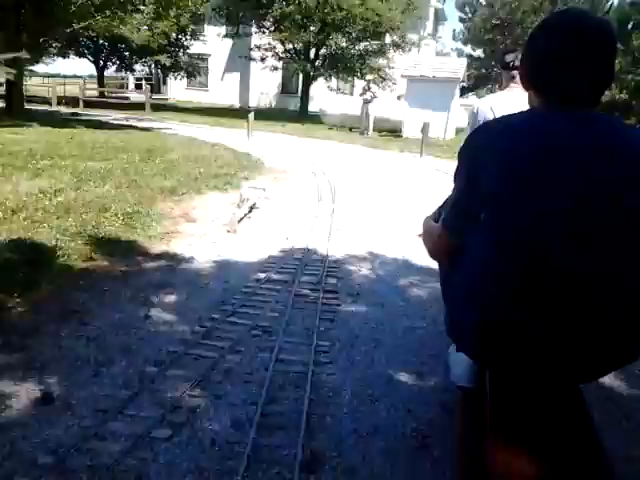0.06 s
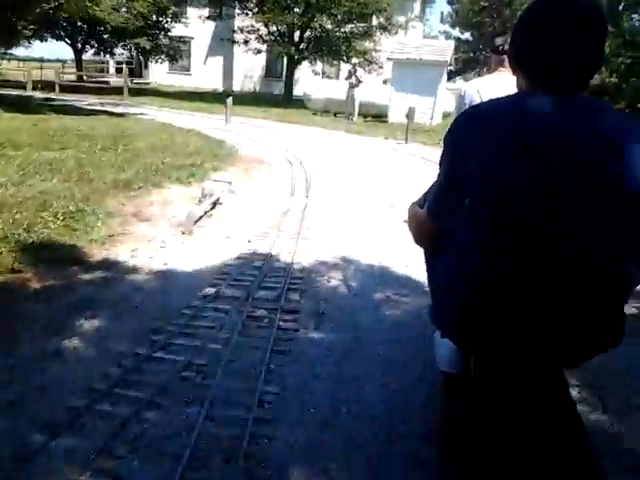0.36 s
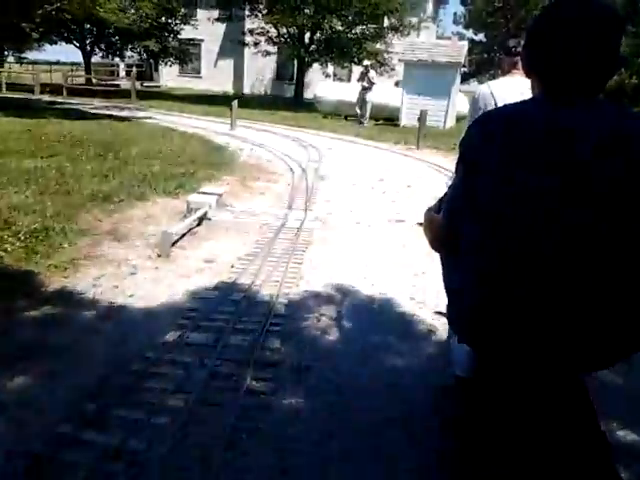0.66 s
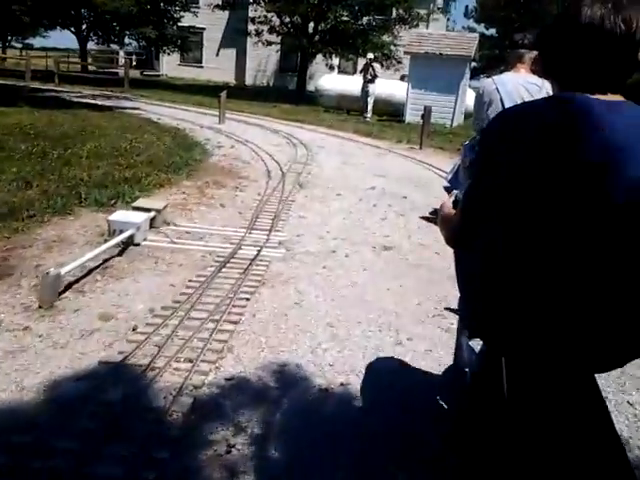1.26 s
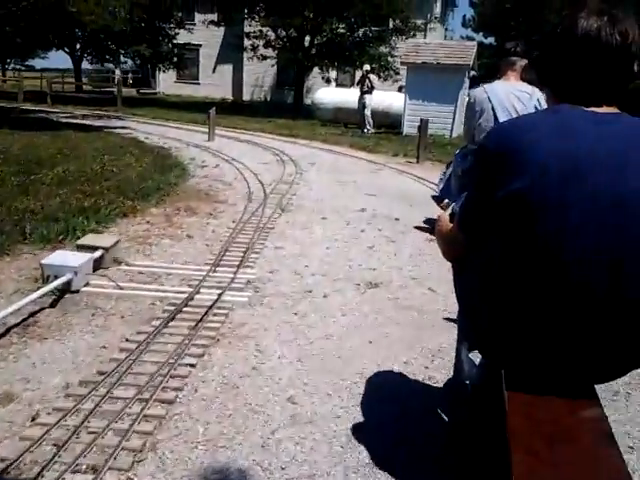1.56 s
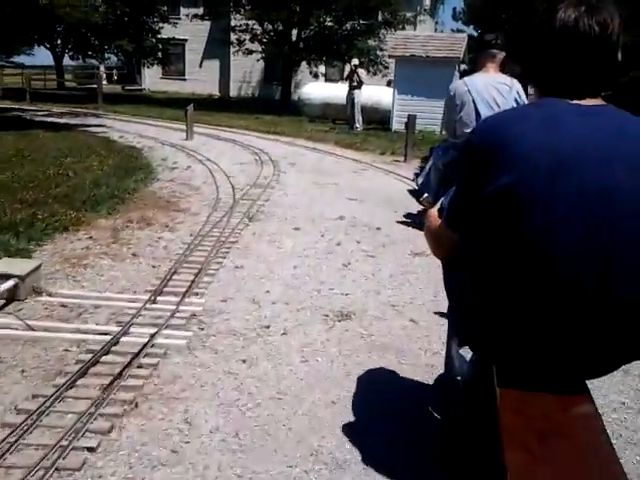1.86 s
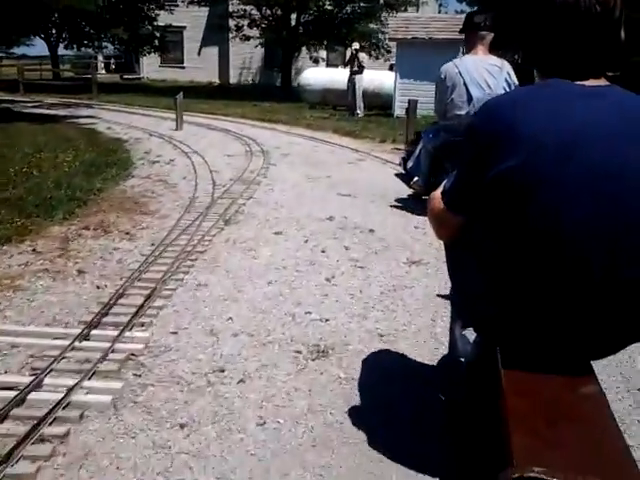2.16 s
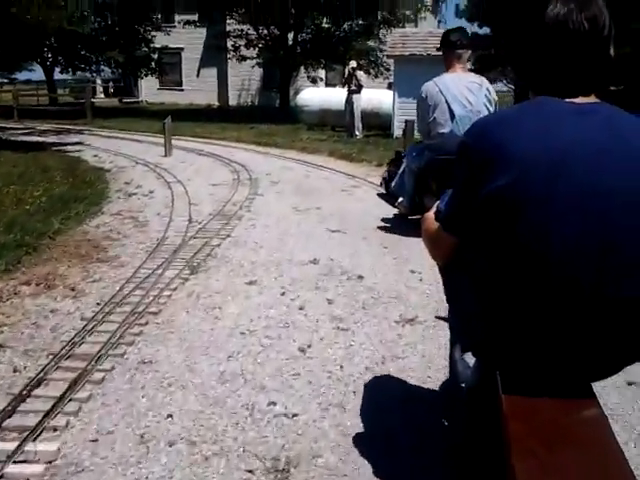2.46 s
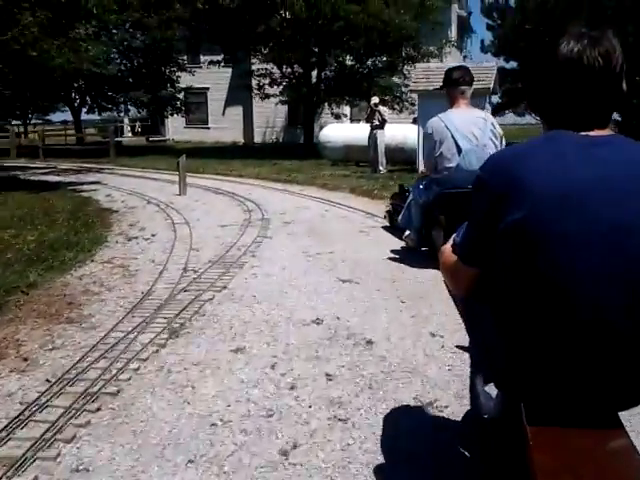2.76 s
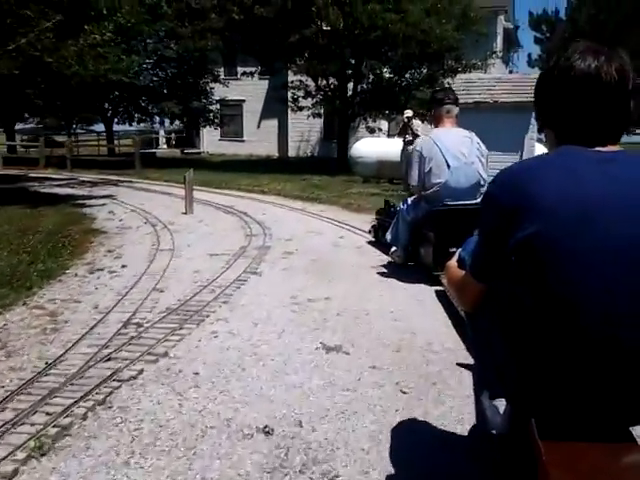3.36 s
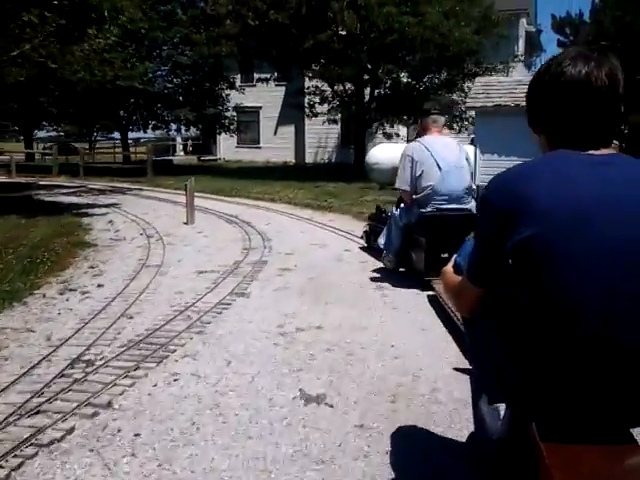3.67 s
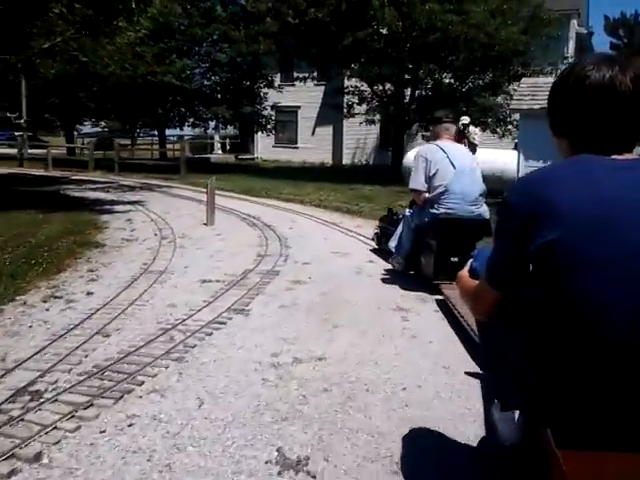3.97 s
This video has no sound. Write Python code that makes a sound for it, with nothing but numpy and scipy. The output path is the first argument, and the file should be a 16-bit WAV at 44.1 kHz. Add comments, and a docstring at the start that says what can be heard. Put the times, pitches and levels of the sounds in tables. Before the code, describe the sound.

Heard from aboard in open air, a small ride-on train rumbles and clacks over rail joints. The clacks come in irregular clusters, turn sharper and ring briefly across a switch, then thin out, with light ticks and dull thumps.

```python
"""Steel wheels of a miniature ride-on train clack over rail joints and a switch, heard from a car.
Each joint excites body, frame and steel; some leave a wheel ringing. Rough rails keep the body
rumbling, the frame rattling and the wheels hissing. Loose metal ticks, the car thumps as it rocks,
flanges brush the rail and grit cracks under the wheels. Open air, no echo."""
import sys
import numpy as np
from scipy import signal
from scipy.fft import rfft, irfft
from scipy.io import wavfile
from scipy.ndimage import uniform_filter1d

SR = 44100
rng = np.random.default_rng(int(sys.argv[2]) if len(sys.argv) > 2 else 0)


def materialize(psi):
    """Save the field psi as 16-bit PCM at rate SR to the path in sys.argv[1].

    A 1-D psi becomes a single channel; in a 2-D psi each row is a channel.
    """
    bounded = np.clip(np.atleast_2d(psi).T, -1, 1)
    quanta = np.round(bounded * 32767).astype(np.int16)
    wavfile.write(sys.argv[1], SR, quanta)


N = 176400
TIME_S = np.arange(N) / SR
HIT_TIME_S = np.arange(SR // 4) / SR
ATTACK_S = 0.0014


def undb(db):
    """Decibels to gain."""
    return 10 ** (np.asarray(db) / 20)


def unit(x):
    """Scale to rms 1."""
    return x / np.sqrt(np.mean(x ** 2))


def curve(points, column=1):
    """Gain over time from one dB column of a timeline."""
    points = np.array(points)
    return undb(np.interp(TIME_S, points[:, 0], points[:, column]))


def wander(rate_hz):
    """Random drift, spread near 1."""
    knots = rng.standard_normal(1024)
    return np.interp(TIME_S * rate_hz, np.arange(len(knots)), knots)


def add(out, start_s, sound):
    """Mix a sound in at a time."""
    i = int(start_s * SR)
    out[i:i + len(sound)] += sound[:N - i]


# Edges of the body, frame and steel bands (frequency [Hz])
BAND_EDGES_HZ = [30, 1550, 3400, 20000]
def colour(x, spectrum, band=None, size=4096):
    """Minimum-phase filter with the given spectrum, optionally cut to one band."""
    hz, db = np.array(spectrum, float).T
    f = np.maximum(np.arange(size // 2 + 1) * SR / size, 1)
    gain = undb(np.interp(np.log(f), np.log(hz), db))
    if band is not None:
        low_hz, high_hz = BAND_EDGES_HZ[band:band + 2]
        gain = gain / np.sqrt((1 + (low_hz / f) ** 16) * (1 + (f / high_hz) ** 16)) + 1e-5
    cepstrum = irfft(np.log(gain))
    cepstrum[1:size // 2] *= 2
    cepstrum[size // 2 + 1:] = 0
    impulse_response = irfft(np.exp(rfft(cepstrum)))
    return signal.fftconvolve(x, impulse_response)[:len(x)]


def resonance(hz, half_width_hz):
    """A mode driven by random contact, rms 1; it radiates no deep bass."""
    f = np.maximum(np.fft.rfftfreq(N, 1 / SR), 1)
    detuning = (f - hz ** 2 / f) / (2 * half_width_hz)
    return unit(irfft(rfft(rng.standard_normal(N)) / (1 + 1j * detuning) ** 2, N))


def ringing(modes, wander_db=4):
    """Modes swell and fade independently as the contact shifts."""
    return sum(resonance(hz, half_width_hz) * undb(db + wander_db * wander(rate_hz=14))
               for hz, half_width_hz, db in modes)


def blow(envelope, spectrum, db, band=None, knock=0):
    """Contact chatter plus an optional knock, filtered; db is the rms of the loudest 10 ms."""
    force = envelope * rng.standard_normal(len(envelope))
    force[int(ATTACK_S * SR)] += knock * np.sqrt(np.sum(envelope ** 2))
    sound = colour(force, spectrum, band)
    peak_rms = np.sqrt(uniform_filter1d(sound ** 2, int(0.01 * SR)).max())
    return sound * undb(db) / peak_rms


# Cracking grit (frequency [Hz], gain [dB])
GRIT_SPECTRUM = [(500, -1), (3000, 4), (5500, -3.5), (8300, 6.5), (11500, -3), (16000, -12)]
def grit(grains_per_s=170, level_db=-48, spread_db=5, decay_s=0.0017):
    """Grains on the rail head crack under the wheels, each a tiny tick of three pitches."""
    out, t = np.zeros(N), np.arange(SR // 50) / SR
    for _ in range(int(grains_per_s * N / SR)):
        pitches_hz = rng.uniform(3300, 13900, size=(3, 1))
        strength = undb(spread_db * min(rng.exponential(), 2))
        tones = np.sin(2 * np.pi * pitches_hz * t).sum(axis=0)
        add(out, rng.random() * N / SR, strength * np.exp(-t / decay_s) * tones)
    return unit(colour(out, GRIT_SPECTRUM)) * undb(level_db)


# Flange contacts (start [s], length [s], frequency [Hz], level [dB])
FLANGE_SCRAPES = [(1.676, 0.019, 8600, -35), (2.105, 0.076, 4530, -41), (3.5, 0.037, 4800, -47)]
def flange_scrapes():
    """A flange brushes the rail: a short swell of narrow-band noise."""
    out = np.zeros(N)
    for start_s, length_s, hz, db in FLANGE_SCRAPES:
        swell = np.sin(np.pi * np.clip((TIME_S - start_s) / length_s, 0, 1))
        out += resonance(hz, half_width_hz=0.08 * hz) * undb(db) * swell
    return out


# Bass noise (frequency [Hz], gain [dB])
BASS_SPECTRUM = [(25, -38), (60, -38), (90, -21), (125, -14), (200, -3), (280, 0.5), (360, 5.5),
                 (450, -12.5), (1000, -80.5), (8000, -100)]
# Bass timeline (time [s], level [dB])
BASS_LEVELS = [(0, -52), (.12, -40), (.28, -49), (.48, -58), (.62, -39), (.8, -39), (.97, -46.5),
               (1.12, -43.5), (1.38, -49), (1.62, -38.5), (1.8, -45), (2.1, -45), (2.4, -52), (2.92, -55),
               (3.08, -40.5), (3.25, -42.5), (3.5, -51.5), (4, -34.5)]
def bass():
    """Weak low noise rises and falls under the rumble."""
    return unit(colour(rng.standard_normal(N), BASS_SPECTRUM)) * curve(BASS_LEVELS)


# Hollow body modes (frequency [Hz], half-width [Hz], relative level [dB])
BODY_MODES = [(499, 28, 0.5), (562.3, 31, 4), (691.4, 73, 9.5)]
# Body resonance timeline (time [s], level [dB])
BODY_LEVELS = [(0, -30.5), (.6, -31), (.95, -31), (1.2, -28), (1.55, -35.5), (1.95, -31), (2.4, -33),
               (2.9, -33), (4, -51)]
def hollow_body():
    """Rolling keeps the hollow car body resonating."""
    return unit(ringing(BODY_MODES)) * curve(BODY_LEVELS)


# Tick of loose metal (frequency [Hz], gain [dB])
TICK_SPECTRUM = [(200, -59), (2000, -7), (6000, -23), (8500, 6.5), (10200, 2), (12000, -23), (16000, -25)]
# Ticks (start [s], level [dB], pitch [ratio])
METAL_TICKS = [(0.141, -34, 1.16), (1.803, -29, 0.99), (1.8204, -31, 0.93), (1.8249, -15, 1.06),
               (1.8258, -23, .97), (1.835, -27, 0.99), (1.884, -42, 1), (2.414, -39, 0.88),
               (2.472, -46, 1.4), (2.718, -47, .9), (3.2412, -33.5, 0.62), (3.2637, -40, 1.2),
               (3.341, -41, 1), (3.897, -33, 1), (3.924, -36, 0.89)]
def loose_metal(decay_s=0.0007):
    """Loose parts strike in short, bright ticks."""
    out = np.zeros(N)
    envelope = np.exp(-HIT_TIME_S / decay_s)
    for start_s, db, pitch in METAL_TICKS:
        add(out, start_s, blow(envelope, np.array(TICK_SPECTRUM) * [pitch, 1], db))
    return out


# Thump of the car (frequency [Hz], gain [dB])
THUMP_SPECTRUM = [(25, -65), (55, -59), (100, -27), (200, -1.5), (320, 9), (600, 8), (1200, 1.5),
                  (3000, -77), (16000, -100)]
# Thumps (start [s], level [dB], pitch [ratio], swell [s])
CAR_THUMPS = [(0.129, -36, 0.64, .018), (.732, -21, 1.05, 0.013), (0.755, -19.5, 0.89, 0.0072),
              (0.774, -34, 0.5, 0.0081), (1.53, -28, 0.8, 0.016), (1.636, -35, 0.52, 0.0086),
              (1.666, -31, 0.57, 0.0095), (1.905, -18.5, .9, 0.0017), (2.13, -33, 0.53, .01),
              (3.185, -26, 1.4, 0.0031), (3.551, -29, 0.87, .005)]
def rocking_car():
    """The car rocks on its wheels with dull, swelling thumps."""
    out, t = np.zeros(N), HIT_TIME_S
    for start_s, db, pitch, swell_s in CAR_THUMPS:
        envelope = t / swell_s * np.exp(-t / swell_s)
        add(out, start_s, blow(envelope, np.array(THUMP_SPECTRUM) * [pitch, 1], db))
    return out


# Rolling noise (frequency [Hz], gain [dB])
ROLL_SPECTRUM = [(30, -54), (70, -45), (120, -46), (180, -28.5), (240, -13.5), (300, -9), (390, 0.5),
                 (500, 3.5), (610, -3.5), (730, 1.5), (940, 3), (1200, -2.5), (1420, -3), (1620, -7),
                 (2000, -2), (2300, -4), (2780, -6.5), (3200, -18.5), (4000, -27), (5200, -27.5),
                 (6100, -28.5), (7100, -22.5), (8200, -19), (9200, -23), (10400, -31.5), (13000, -39.5),
                 (16000, -40)]
# Rolling base levels (time [s], body rumble [dB], frame rattle [dB], wheel hiss [dB])
ROLL_LEVELS = [(0, -20.5, -28, -34.5), (.15, -21, -33.5, -36), (.45, -23, -30, -37), (.68, -25, -33, -37),
               (.82, -21, -28.5, -33), (.97, -28, -33.5, -37.5), (1.15, -22.5, -28.5, -34),
               (1.38, -21.5, -30.5, -36), (1.6, -26, -31.5, -41.5), (1.78, -23, -29, -36),
               (1.95, -22, -31.5, -35), (2.18, -23, -31, -35), (2.35, -23.5, -30, -35),
               (2.6, -24.5, -32, -36.5), (3.05, -25, -34, -36), (3.22, -20.5, -29, -32.5),
               (3.58, -24, -31, -37), (4, -21.5, -31, -34)]
# Roughness; rows body, frame, steel (bump spread [dB], flutter [dB], level offset [dB])
BAND_ROUGHNESS = [(2.5, 0.6, -5), (2, 2, -4), (-1, 1.66, -4)]
# Wheel and frame modes (frequency [Hz], half-width [Hz], level re base rumble [dB])
WHEEL_FRAME_MODES = [(241, 16.6, -29.5), (369.5, 37, -19), (872, 49, -14.5), (1004, 39, -14),
                     (1144, 72, -19.5), (1333, 54, -22), (1450, 31, -24), (1980, 190, -22),
                     (2280, 120, -20.5), (3643, 99, -35), (4286, 310, -34), (8150, 330, -28.5),
                     (9460, 160, -34), (11000, 280, -40), (13400, 150, -55)]
def rolling(bumps_per_s=12000):
    """Tiny rail bumps shake body, frame and wheels together and keep their modes ringing."""
    out = np.zeros(N)
    shake_db = 1.35 * wander(rate_hz=23.77)
    for band, (spread_db, flutter_db, offset_db) in enumerate(BAND_ROUGHNESS):
        sizes = undb(spread_db * np.minimum(rng.exponential(size=N), 5))
        bumps = (rng.random(N) < bumps_per_s / SR) * rng.standard_normal(N) * sizes
        noise = unit(colour(bumps, ROLL_SPECTRUM, band))
        gain = undb(offset_db + shake_db + flutter_db * wander(rate_hz=45))
        out += noise * gain * curve(ROLL_LEVELS, column=band + 1)
    return out + ringing(WHEEL_FRAME_MODES) * curve(ROLL_LEVELS)


# Wheel or rail notes after a joint (start [s], frequency [Hz], level [dB], t60 [s])
WHEEL_NOTES = [(.204, 13540, -45, .3), (.31, 13540, -45, .42), (0.311, 5600, -32.5, 0.095),
               (1.66, 9600, -26, 0.21), (1.746, 9490, -29, 0.11), (1.746, 4200, -31, .075),
               (1.869, 13600, -44, .2), (1.867, 3830, -16, 0.037), (1.869, 2780, -14, 0.027),
               (1.876, 860, -15, 0.071), (1.955, 15000, -44, .3), (1.957, 2500, -15, 0.028),
               (1.955, 3670, -33, 0.18), (1.953, 4000, -15, 0.024), (1.97, 4030, -36, 0.16),
               (1.955, 4900, -42, .25), (2.222, 2755, -15, 0.023), (2.31, 3100, -19, 0.022),
               (2.31, 3030, -18, 0.04), (2.31, 1300, -24, .06)]
def wheel_rings(rise_s=0.0021, split_hz=18, twin_db=-17.5):
    """A struck wheel rings; being slightly out of round, each note beats with a weaker twin."""
    out, t = np.zeros(N), HIT_TIME_S
    for start_s, hz, db, t60_s in WHEEL_NOTES:
        note = np.sin(2 * np.pi * hz * t)
        twin = undb(twin_db) * np.sin(2 * np.pi * ((hz + split_hz) * t + rng.random()))
        envelope = (1 - np.exp(-t / rise_s)) * undb(-60 * t / t60_s)
        add(out, start_s, undb(db) * envelope * (note + twin))
    return out


# Joint clack (frequency [Hz], gain [dB])
CLACK_SPECTRUM = [(80, -75), (200, -28.5), (420, -3), (750, -6.5), (1020, -3), (1600, -10.5), (2100, -3.5),
                  (2750, -7.5), (3250, -15), (3900, -11), (5200, -13.5), (6300, -9.5), (7800, -2),
                  (9800, -7.5), (12000, -14.5), (15500, -22)]
# Response to a joint; rows body, frame, steel
# (decay [s], tail level [dB], tail decay [s], resonance height [dB], half-width [octaves])
CLACK_RESPONSE = [(0.0079, -25, 0.0062, 7, 0.073), (0.0053, -18, .012, 10.5, 0.053),
                  (0.0016, -12.5, 0.013, 8, 0.1)]
# Contact time below which knock outweighs chatter (body [s], frame [s], steel [s])
KNOCK_LIMIT_S = [0.0012, 0.00049, 0.0012]
# Wheels on joints (start [s], contact [s], body, frame, steel level [dB], same three resonances [Hz])
JOINT_HITS = [(.024, 0.0015, -18, -26.5, -23.5, 1030, 2260, 8700),
              (.0898, 0.0027, -20, -21, -19, 1065, 2620, 6650),
              (.113, 0.0017, -20, -21, -18, 790, 2300, 7400),
              (.1803, 0.0014, -26, -19, -17.5, 490, 2010, 10600),
              (.196, 0.0016, -23, -28, -33, 462, 2207, 8500),
              (.2026, 0.0012, -29, -32, -19, 441, 1787, 10500),
              (.3083, 0.0026, -17.5, -19.5, -20, 746, 2240, 9700),
              (.3175, 0.0022, -16.5, -23.5, -39, 725, 2540, 8500),
              (.398, 0.0025, -24, -21.5, -19.5, 1020, 2460, 8400),
              (.8514, 0.0027, -27, -49, -30, 505, 1636, 8500),
              (.951, .002, -23, -30, -31.5, 790, 2100, 8300),
              (1.023, 0.0025, -18.5, -24.5, -28, 960, 1890, 8900),
              (1.040, 0.0017, -29, -26.5, -31, 800, 2100, 8300),
              (1.1103, 0.0059, -18, -28, -29.5, 524, 2034, 8400),
              (1.2145, 0.0039, -14, -26.5, -27.5, 780, 2100, 6250),
              (1.3027, 0.0015, -18, -25.5, -27, 890, 2240, 8500),
              (1.6568, 0.0039, -21.5, -26.5, -20, 710, 2153, 8200),
              (1.7432, 0.0023, -20, -23.5, -17, 530, 2440, 9000),
              (1.8668, 0.0019, -17.5, -25.5, -17.5, 440, 2760, 10400),
              (1.9522, 0.0035, -22, -25.5, -21, 605, 2200, 6840),
              (2.0166, 0.00095, -16, -23.5, -27.5, 970, 2024, 7500),
              (2.1017, 0.0016, -17.5, -24, -22, 970, 1750, 9200),
              (2.2224, 0.0027, -19.5, -22.5, -19, 1300, 2740, 8300),
              (2.2563, 0.0045, -28, -21, -18, 398, 2040, 9000),
              (2.2975, 0.0024, -20.5, -48, -36, 840, 1808, 8500),
              (2.3082, .004, -18.5, -18.5, -19, 725, 2750, 8150),
              (2.512, 0.0067, -23.5, -46, -52, 979, 2250, 8500),
              (2.7412, .003, -32, -34, -30.5, 785, 2077, 8300),
              (2.828, 0.0031, -45, -29, -33, 656, 2282, 8400),
              (3.0952, 0.0047, -17.5, -27, -25, 1040, 1750, 9600),
              (3.1828, 0.00085, -16, -34, -33.5, 516, 1948, 8500),
              (3.2218, 0.00074, -20.5, -32, -34, 920, 2330, 8500),
              (3.5455, .002, -30, -34, -32.5, 872, 1819, 8600),
              (3.6225, .003, -34, -32, -32, 726, 2099, 8600),
              (3.8758, 0.0022, -22.5, -28.5, -24.5, 915, 2060, 11000),
              (3.9597, 0.0039, -17, -34, -22, 1130, 2130, 9600)]
def rail_joints():
    """Each wheel crashes over the gap for a few ms, exciting a resonance in body, frame and steel."""
    out, t = np.zeros(N), HIT_TIME_S
    hz = np.geomspace(40, SR / 2, 512)
    clack_hz, clack_db = np.array(CLACK_SPECTRUM).T
    base_db = np.interp(np.log(hz), np.log(clack_hz), clack_db)
    for start_s, contact_s, *per_band in JOINT_HITS:
        levels_db, resonances_hz = per_band[:3], per_band[3:]
        for band, (decay_s, tail_db, tail_s, height_db, half_width_oct) in enumerate(CLACK_RESPONSE):
            detuning = np.log2(hz / resonances_hz[band]) / half_width_oct
            spectrum = np.c_[hz, base_db + height_db / (1 + detuning ** 2)]
            crash = np.exp(-np.maximum(t - contact_s, 0) / decay_s)
            tail = undb(tail_db) * np.exp(-t / tail_s)
            envelope = np.minimum(t / ATTACK_S, 1) * (crash + tail)
            knock = KNOCK_LIMIT_S[band] / contact_s
            add(out, start_s, blow(envelope, spectrum, levels_db[band], band, knock))
    return out


def scene():
    """Mono mix of close sources, no walls to echo them."""
    background = grit() + flange_scrapes() + bass() + hollow_body() + loose_metal() + rocking_car()
    return (background + rolling() + wheel_rings() + rail_joints())[None]


def record(dry, ceiling=0.95, cutoff_hz=15750):
    """Soft clipping rounds the sharpest peaks; a steep low-pass cuts the top."""
    lowpass = signal.ellip(10, 0.2, 80, cutoff_hz, fs=SR, output="sos")
    return signal.sosfilt(lowpass, ceiling * np.tanh(dry / ceiling))


dry = scene()
out = record(dry)
materialize(out)
```